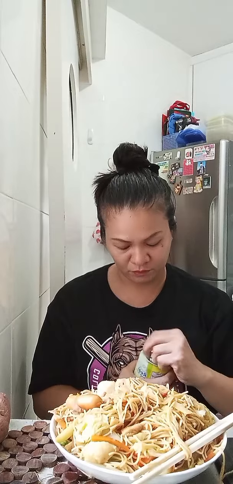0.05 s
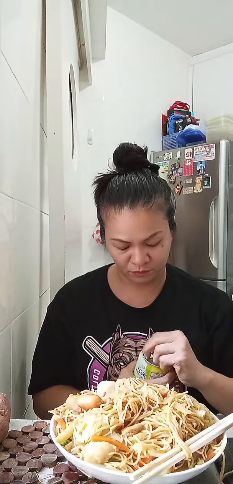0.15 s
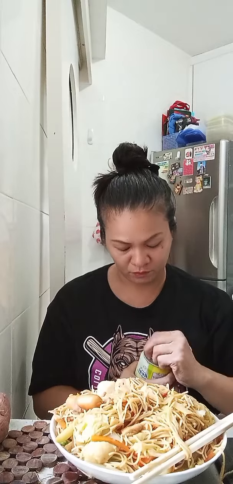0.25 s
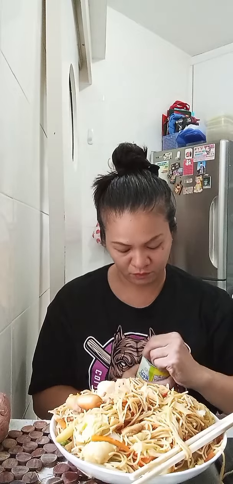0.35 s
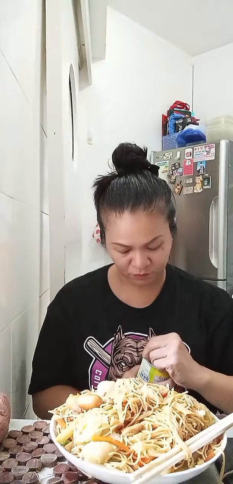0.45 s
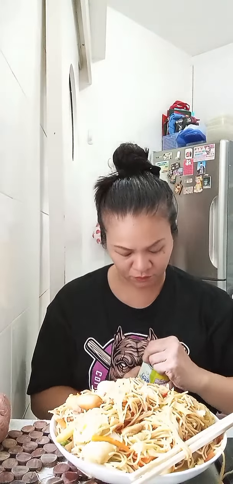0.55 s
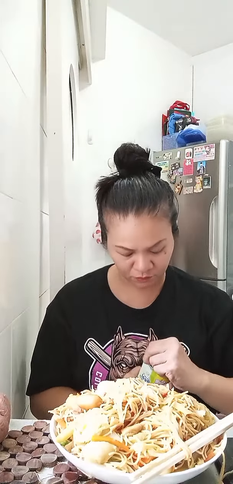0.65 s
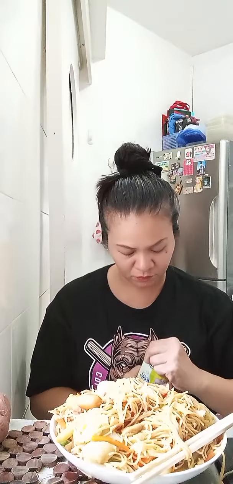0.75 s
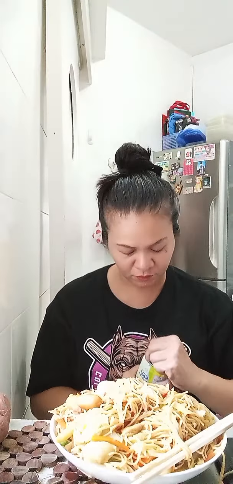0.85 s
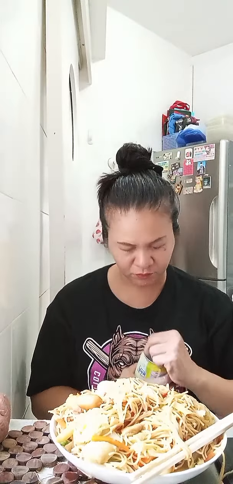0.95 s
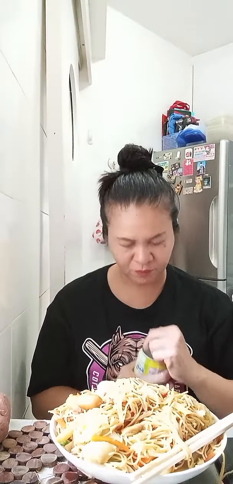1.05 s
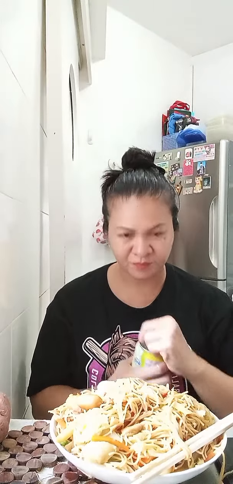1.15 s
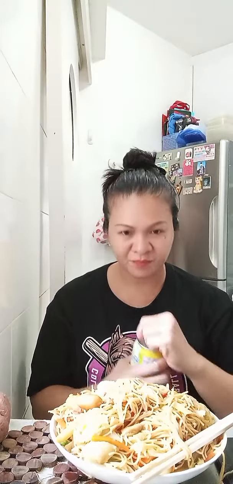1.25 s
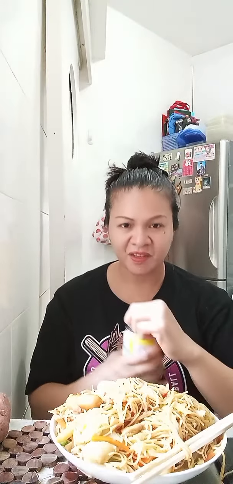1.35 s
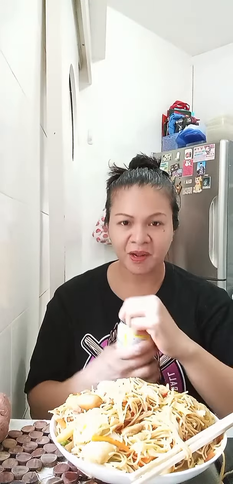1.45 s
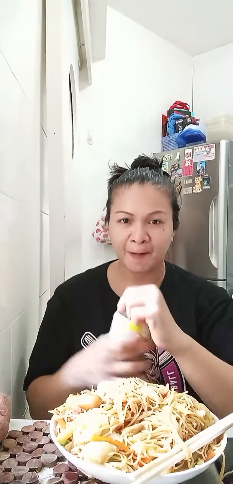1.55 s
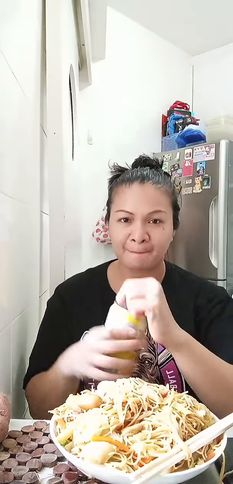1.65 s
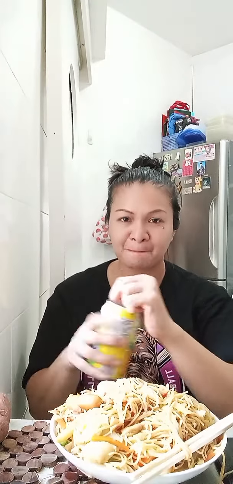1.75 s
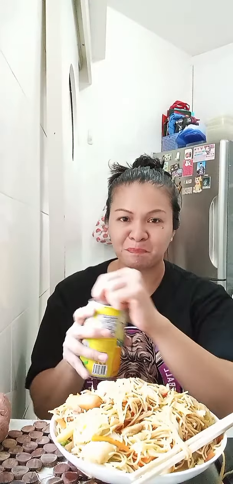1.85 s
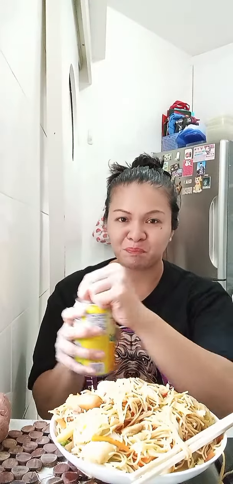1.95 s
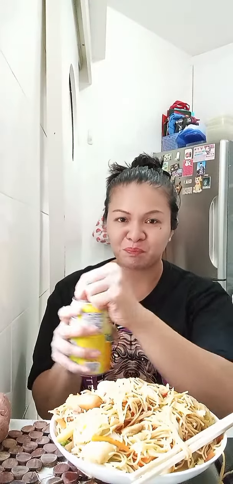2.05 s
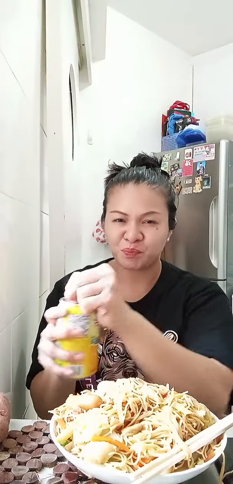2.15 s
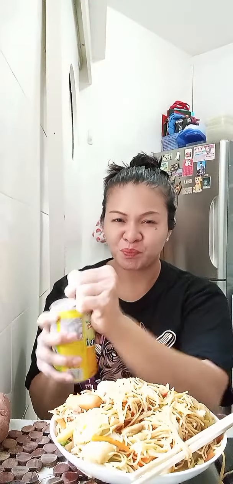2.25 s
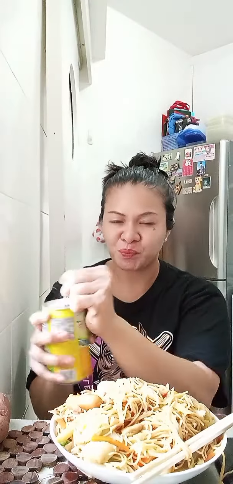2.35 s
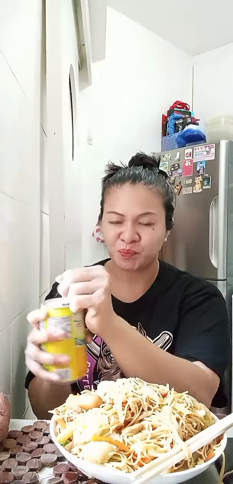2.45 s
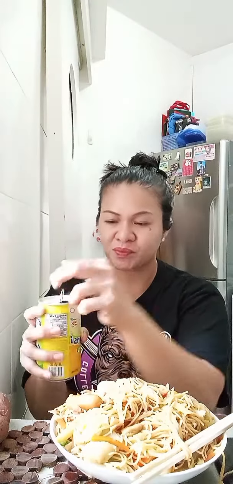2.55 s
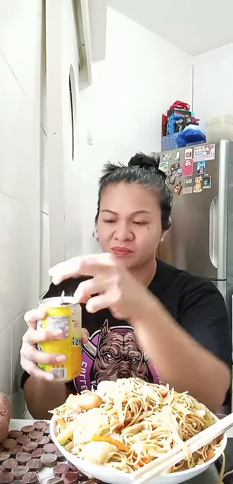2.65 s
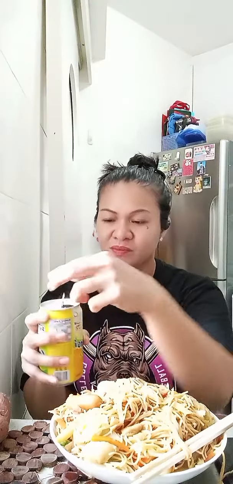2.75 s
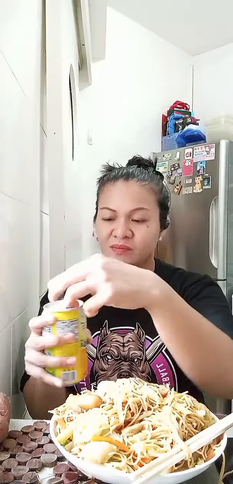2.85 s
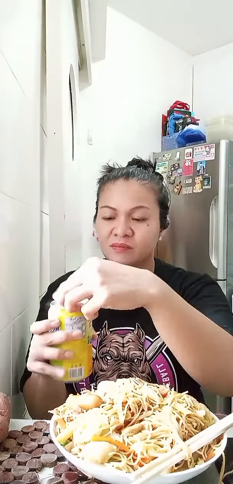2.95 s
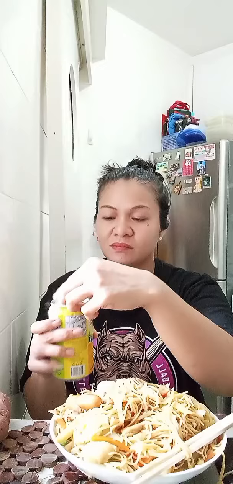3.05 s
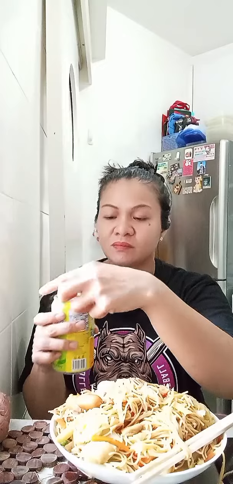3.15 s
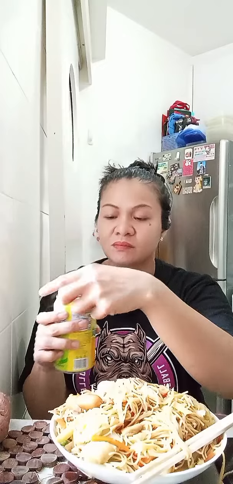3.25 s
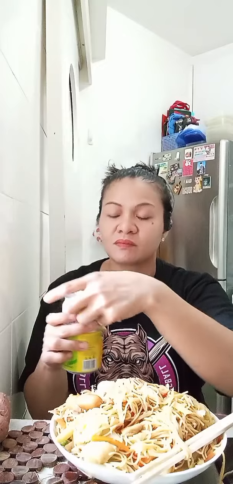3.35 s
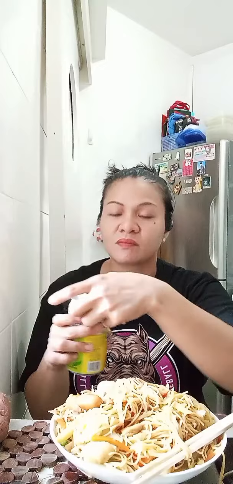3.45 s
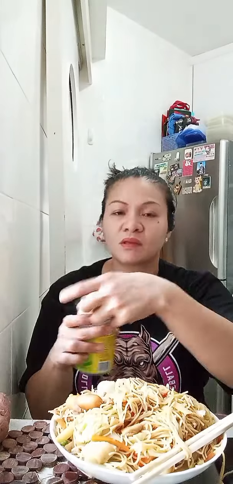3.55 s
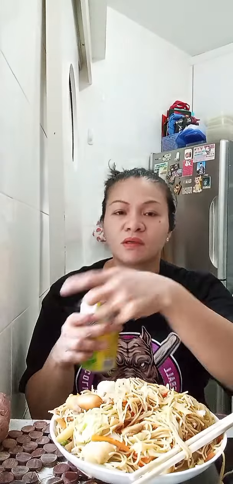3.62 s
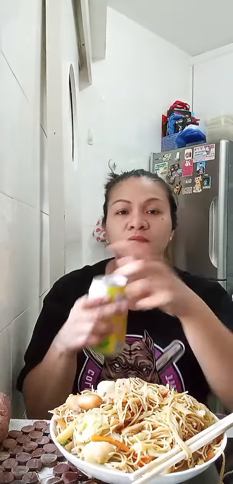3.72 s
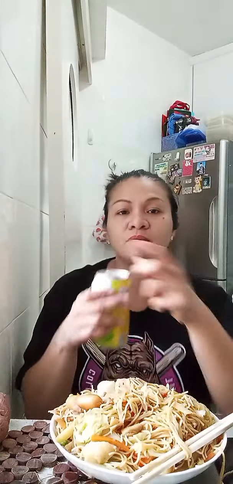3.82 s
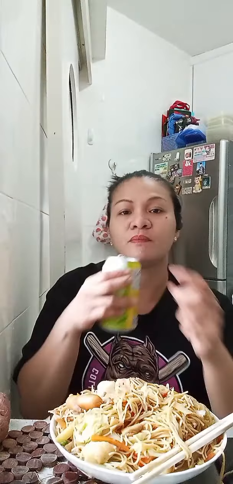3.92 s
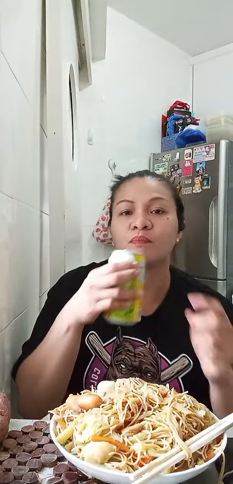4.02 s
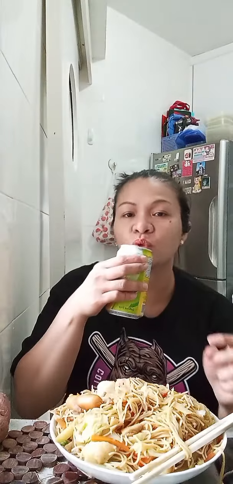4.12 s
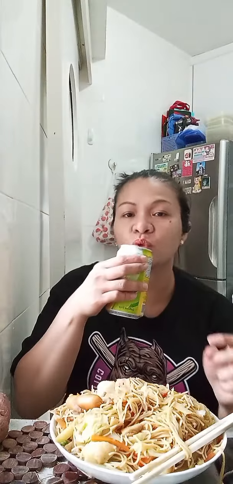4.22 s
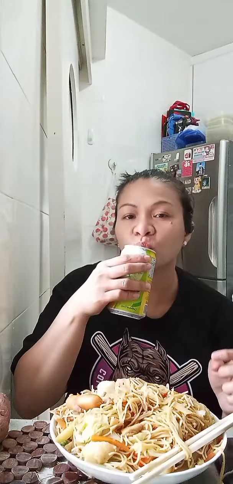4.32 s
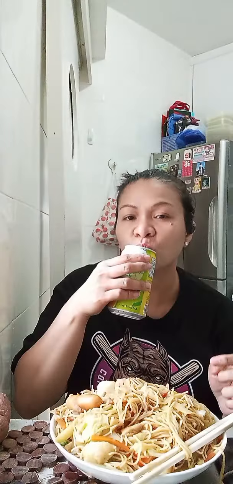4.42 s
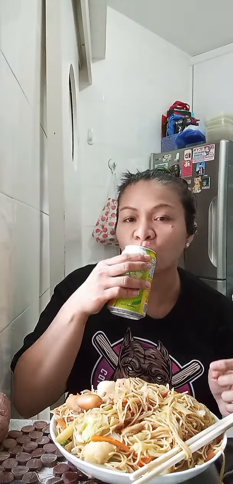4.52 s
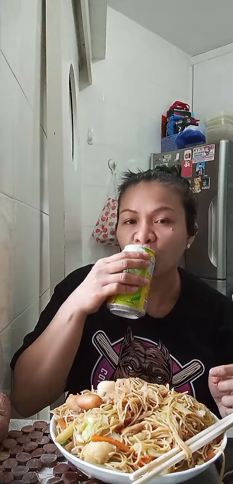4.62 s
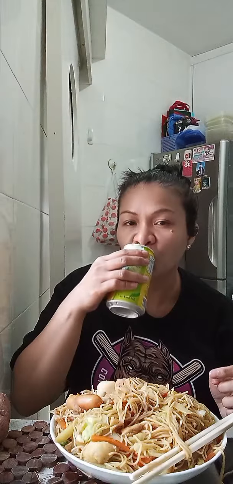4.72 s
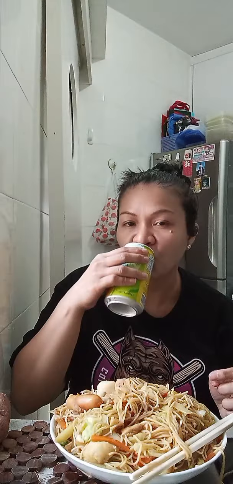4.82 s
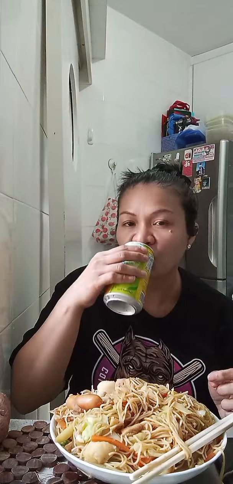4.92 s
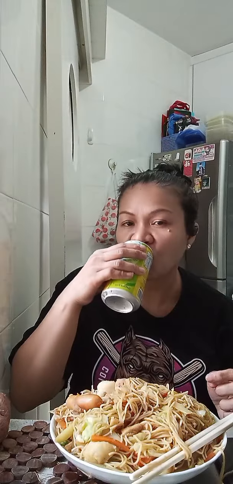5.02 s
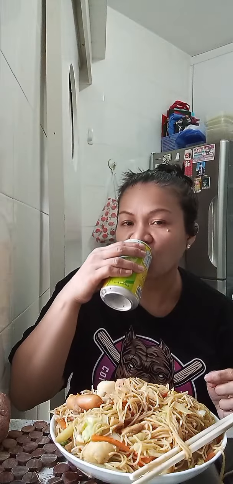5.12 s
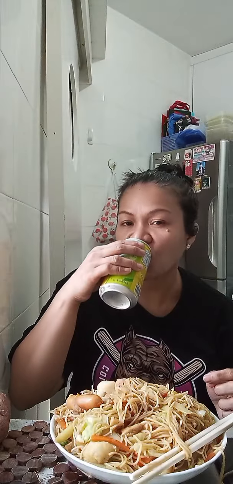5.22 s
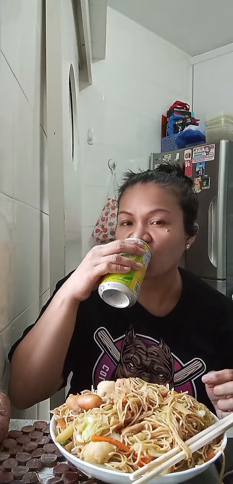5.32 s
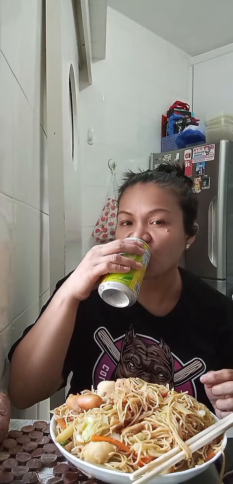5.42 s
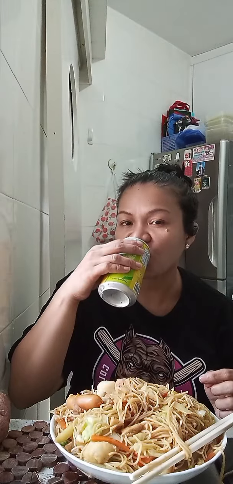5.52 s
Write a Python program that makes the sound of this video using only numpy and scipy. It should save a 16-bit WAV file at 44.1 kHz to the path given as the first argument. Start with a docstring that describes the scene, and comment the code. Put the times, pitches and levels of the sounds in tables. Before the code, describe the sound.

Throughout about 5.5 seconds, a fan hums low and slightly wavering, near 100 Hz, with a faint whine and soft rushing air in a small tiled kitchen. Thin, very quiet high squeaks come now and then. At 0.86 s a can's seal cracks: a sharp, bright spurt of gas with an instantaneous whistle and a faint singing note, gone in roughly a quarter second. Tiny ticks of fingers on the can follow around 1.4-1.6 s. At 2.27 s the tab clicks, at 2.30 the lid tears loudly with a hollow, rapidly stuttering pop and short fizz, and at 2.38 the flap snaps inward with a tinny ring. Short reflections trail off; the fan, briefly ducked by limiting, swells back. Light touches occur near 3.1, 3.5 and 4.0 s, with faint low bumps at 4.1, 4.16 and 5.07, then barely audible touches until the end. Close single microphone, identical in both channels.

```python
"""A drink can is opened by hand in a small tiled kitchen where a fan hums and now and then squeaks.
Coloured noise makes the short first spurt of gas and the later fizz; the spurt also whistles and sings.
The tab clicks, the lid tears with a pop and its flap snaps inward: noise bursts, can modes, air pulses.
Band noise makes light touches on the can and three faint low bumps in the fan's noise.
The fan is harmonics, a whine and rushing air. One microphone with a limiter."""
import sys
import numpy as np
from scipy import signal
from scipy.fft import rfft, irfft, next_fast_len
from scipy.io import wavfile
from scipy.ndimage import uniform_filter1d, minimum_filter1d, map_coordinates

SR = 44100
rng = np.random.default_rng(int(sys.argv[2]) if len(sys.argv) > 2 else 0)


def output_pcm(signal):
    """Save a mono or channel-first signal as 16-bit PCM at the path in sys.argv[1].

    Samples are clipped to [-1, 1] before scaling.
    """
    pcm = np.clip(np.atleast_2d(signal).T, -1, 1) * 32767
    wavfile.write(sys.argv[1], SR, np.round(pcm).astype(np.int16))


N = 246078

# snaps of the lid (tab, tear, flap): (time [s], crack level [dB], rise [s], crack t60 [s],
# ring level [dB], share of the free ring time [1], room level [dB])
LID_SNAPS = [(2.269, -14, 0.0013, 0.079, -13, 0.37, -9), (2.3008, 0.5, 0.0021, 0.04, -16, 0.84, -19),
             (2.3826, -7.5, 0.0025, 0.088, -10.5, 0.72, -12.5)]
# noise colour of the gas spurt: (frequency [Hz], density [dB per Hz])
GAS_COLOUR = [(100, -29), (250, -14), (450, -9), (620, -11.5), (1200, -6.5), (1850, -4), (2500, -11.5),
              (3700, -6), (5200, -3), (6200, -5), (7200, -2.5), (9600, -12), (14200, -8), (16000, -16)]
# noise colour of the tab click: (frequency [Hz], density [dB per Hz])
TAB_COLOUR = [(290, -79), (500, -61), (933, -60), (1200, -16), (1670, -6.5), (1980, -3), (2570, -18),
              (3100, -17.5), (3800, -10), (4450, -1), (4900, -12.5), (5450, -3), (6140, -19), (6700, -12.5),
              (7500, -19.5), (14900, -28), (16000, -18)]
# noise colour of the tear, also of the fizz through it: (frequency [Hz], density [dB per Hz])
TEAR_COLOUR = [(240, -72), (400, -23.5), (935, -4), (1330, -9.5), (1900, -9), (2250, -2), (2650, -15),
               (3370, -6.5), (3800, -13), (4310, -9), (4900, -10), (5600, -1.5), (7060, -4.5),
               (9320, -23.5), (13500, -15), (16000, -26)]
# noise colour of the flap snap: (frequency [Hz], density [dB per Hz])
FLAP_COLOUR = [(100, -48), (200, -23), (300, -16), (400, -14), (540, -16), (680, -7.5), (880, -4),
               (1130, -15), (1340, -4), (1560, -8), (1950, -3), (2550, -21), (3000, -11), (3450, -7),
               (3850, -19), (4400, -16), (5500, -21), (7000, -20), (10500, -35), (14200, -28), (16000, -40)]
# modes of the can: (frequency [Hz], level [dB], free t60 [s])
CAN_MODES = [(298.7, -5.5, 0.34), (388, 1.5, 0.18), (488, -1.5, 0.15), (654, 3.5, 0.18), (710, 2, 0.17),
             (873, -3, 0.21), (929, -3, .17), (1292, -0.5, .15), (1686, -5.5, 0.18), (1950, -3, 0.32),
             (2007, -6.5, 0.35), (2103, -4.5, 0.19), (2270, -3.5, 0.22), (2960, -8, 0.33), (3230, -7, 0.31),
             (3310, -10, 0.32), (4060, -6, 0.11), (4475, 7.5, .075), (5140, 5, .06), (5310, 5, 0.072),
             (5584, 9, .065), (6810, 7, .085)]
# resonances and dips of the slit and lid in the gas jet: (centre [Hz], width [Hz], gain [dB])
SLIT_RESONANCES = [(1650, 70, 3), (1820, 89, 5.5), (2024, 100, 3), (2990, 130, 5), (3550, 110, 3.5),
                   (3920, 80, 5.5), (4350, 170, -5), (5280, 150, 4), (5500, 120, -5), (6580, 45, 5),
                   (6900, 50, 12.5), (7190, 55, 9.5), (7880, 50, 12.5), (8200, 45, 7)]
# light touches on the can, and three faint low bumps in the fan's noise (4.106, 4.157, 5.065 s):
# (time [s], level [dB], centre [Hz], width [octaves], t60 [s])
TOUCHES_AND_BUMPS = [(.145, -57, 4800, 0.49, .04), (1.423, -51, 11500, 0.67, 0.02),
                     (1.447, -44, 7020, 0.17, .02), (1.505, -51.5, 3320, .45, 0.13),
                     (1.507, -52.5, 9000, 0.74, 0.028), (1.573, -59, 4400, .2, .02),
                     (1.580, -51, 4170, .22, 0.024), (2.59, -53, 2200, 1.24, .09),
                     (3.069, -59.5, 7450, 0.88, .03), (3.145, -42, 1420, 0.33, 0.041),
                     (3.487, -57, 4140, 0.94, 0.45), (3.542, -46, 3300, 1.24, 0.084),
                     (3.58, -54, 4500, 1.5, 0.026), (3.693, -55.5, 4100, 1.2, 0.078),
                     (3.747, -61, 14500, .25, .04), (4.03, -45.5, 5260, 0.77, 0.019),
                     (4.106, -37, 696, 0.53, .04), (4.157, -39.5, 1100, 0.53, .035),
                     (4.96, -59.5, 4100, .4, .15), (5.065, -43.5, 900, 0.79, .06),
                     (5.1, -58.5, 4200, 0.25, 0.22), (5.21, -55.5, 5000, 0.62, .07),
                     (5.273, -53, 5070, 0.32, 0.08)]
# squeaks of the fan: (mid time [s], level [dB])
FAN_SQUEAKS = [(.392, -64), (1.562, -55.5), (2.596, -60.5), (2.738, -66), (3.397, -61), (3.648, -57.5),
               (4.56, -58), (5.47, -56.5)]
# hum of the fan: (multiple of the motor tone [1], level [dB])
HUM_HARMONICS = [(1, 0), (2, -12), (3, -5), (4, -15.5), (5, -22.5)]
# noise colour of the air rushing from the fan: (frequency [Hz], density [dB per Hz])
DRAUGHT_COLOUR = [(20, -16), (40, -29), (70, -5.5), (130, 1), (270, 0.5), (480, -2.5), (900, -11.5),
                  (1300, -6), (1700, -17.5), (2400, -25.5), (7000, -30.5), (8500, -43), (11500, -45.5),
                  (14000, -38), (16000, -56)]
# resonances of the fan casing: (centre [Hz], width [Hz], gain [dB])
CASING_RESONANCES = [(128, 12, 4), (416, 10.4, 6.5), (792, 100, 8.5), (1080, 34, 9), (1962, 150, 6.5),
                     (6100, 460, 6)]
# decay of the tiled room: (frequency [Hz], t60 [s])
KITCHEN_DECAY = [(200, 0.4), (1000, 0.24), (2500, 0.4), (7000, 0.29), (15000, 0.3)]

TOP_HZ = 16000
# motor level: fixed mean, slow drift, faster flutter; rates in random knots per second
MOTOR_DB = -46.5
MOTOR_DRIFT_DB, MOTOR_DRIFT_PER_S = 0.94, 4.01
MOTOR_FLUTTER_DB, MOTOR_FLUTTER_PER_S = 1.76, 13
SQUEAK_HZ, SQUEAK_SCATTER = 7050, 0.0063  # scatter: share of the pitch
# first spurt: builds, sags as the pressure drops, dies away
SPURT_START_S, SPURT_DB, SPURT_ATTACK_S, SPURT_HOLD_S = 0.8573, -17.5, 0.0029, 0.034
SPURT_SAG_DB_PER_S, SPURT_RELEASE_DB_PER_S = 127.5, 268
# the narrow slit whistles briefly just after it opens
WHISTLE_DELAY_S, WHISTLE_DB, WHISTLE_ATTACK_S, WHISTLE_FADE_DB_PER_S = 0.0033, -9.5, 0.002, 2600
# the jet sets the taut lid singing; the note fades slower than the hiss releases
SING_HZ, SING_DB, SING_ATTACK_S, SING_FADE_DB_PER_S = 1824, -35, 0.015, 170
# the rest of the gas leaves through the tear by the same law
FIZZ_START_S, FIZZ_DB, FIZZ_ATTACK_S, FIZZ_HOLD_S = 2.3025, -17, 0.0028, 0.14
FIZZ_SAG_DB_PER_S, FIZZ_RELEASE_DB_PER_S = 187, 380


def amp(db):
    """Decibels to gain."""
    return 10 ** (np.asarray(db) / 20)


def unit(x):
    """Scale to rms 1."""
    return x / np.sqrt(np.mean(x ** 2) + 1e-20)


def along(points, hz):
    """Interpolate (Hz, value) points on a log frequency axis."""
    point_hz, values = np.transpose(points)
    return np.interp(np.log(hz + 1), np.log(point_hz + 1), values)


def humps(peaks, hz):
    """Gain of resonances or dips standing on a flat response."""
    gain = 1
    for centre_hz, width_hz, db in peaks:
        gain = gain + (amp(db) - 1) / (1 + (2 * (hz - centre_hz) / width_hz) ** 2)
    return gain


def wobble(knots_per_s):
    """Smooth random curve through normally distributed knots."""
    knots = rng.standard_normal(int(N * knots_per_s / SR) + 4)
    return map_coordinates(knots, [np.arange(N) * knots_per_s / SR])


def noise(gain, size=N):
    """Noise of rms 1, coloured by a gain of frequency."""
    spectrum = rfft(rng.standard_normal(size)) * gain(np.fft.rfftfreq(size, 1 / SR))
    return unit(irfft(spectrum, size))


def tone(hz, waver, waver_hz):
    """Sine of rms 1; its pitch wavers at random by a share of itself, below waver_hz."""
    pitch_hz = hz * (1 + waver * noise(lambda f: f < waver_hz))
    return unit(np.sin(2 * np.pi * np.cumsum(pitch_hz) / SR))


def add(track, start_s, sound):
    """Mix a sound into the track from start_s."""
    part = track[round(start_s * SR):][:len(sound)]
    part += sound[:len(part)]


def kitchen(x, room_db):
    """Direct sound plus the tiled walls' answer: noise decaying at its own rate in each band."""
    hz, t, bands = signal.stft(rng.standard_normal(SR // 2), SR, nperseg=256)
    decay = amp(-60 * t / along(KITCHEN_DECAY, hz)[:, None])
    tail = signal.istft(bands * decay, SR, nperseg=256)[1]
    tail *= 1 - np.exp(-(np.arange(len(tail)) / SR / 0.012) ** 2)  # echoes build up as they return
    echoes = signal.fftconvolve(x, tail / np.linalg.norm(tail))[:len(x)]
    return x + amp(room_db) * echoes


def fan(motor_hz=98.2, air_db=-44.0, whine_hz=2950, whine_width_hz=115, whine_db=-62):
    """Unsteady motor hum and wavering bearing whine under air that resonates in casing and room."""
    pitch_hz = motor_hz * (1 + 0.0055 * wobble(5) + 0.01194 * wobble(25))
    phase = 2 * np.pi * np.cumsum(pitch_hz) / SR
    hum = np.zeros(N)
    for multiple, db in HUM_HARMONICS:
        harmonic = unit(np.sin(multiple * phase + 2 * np.pi * rng.random()))
        hum += amp(db + 1.67 * wobble(20)) * harmonic
    drift_db = MOTOR_DRIFT_DB * wobble(MOTOR_DRIFT_PER_S)
    flutter_db = MOTOR_FLUTTER_DB * wobble(MOTOR_FLUTTER_PER_S)
    motor = amp(MOTOR_DB + drift_db + flutter_db) * hum

    whine = noise(lambda hz: 1 / (1 + ((hz - whine_hz) / whine_width_hz) ** 2))
    whine *= amp(whine_db + 1.65 * wobble(30))

    rush = noise(lambda hz: amp(along(DRAUGHT_COLOUR, hz)) * humps(CASING_RESONANCES, hz))
    air = amp(air_db + 0.93 * wobble(18)) * unit(kitchen(rush, room_db=-7.5))
    return motor + whine + air


def touches_and_bumps(grain_db=2, swell_db=-17, swell_s=0.021):
    """Light touches on the can and faint low bumps: decaying band noise, each inside a soft swell."""
    out = np.zeros(N)
    t = np.arange(-SR // 10, SR // 5) / SR  # onset at 0
    for time_s, db, centre_hz, octaves, t60_s in TOUCHES_AND_BUMPS:
        band = noise(lambda hz: (1 + (np.log2((hz + 1) / centre_hz) / octaves) ** 2) ** -2, size=len(t))
        tick = amp(-60 * np.maximum(t, 0) / t60_s) * (t > 0)
        swell = amp(swell_db) * np.exp(-(t / swell_s - 0.5) ** 2)
        add(out, time_s + t[0], amp(db) * (tick + swell) * band)
    grain = unit(amp(grain_db * wobble(700)))
    return kitchen(out * grain, room_db=-7.5)


def squeaks(length_s=0.047, octave_db=-11):
    """A dry bearing gives thin, short squeaks near one pitch, with a weak octave."""
    out = np.zeros(N)
    size = int(length_s * SR)
    for mid_s, db in FAN_SQUEAKS:
        hz = SQUEAK_HZ * (1 + SQUEAK_SCATTER * rng.standard_normal())
        pitch_hz = hz * (1 + 0.0088 * noise(lambda f: f < 300, size=size))
        phase = 2 * np.pi * np.cumsum(pitch_hz) / SR
        voice = np.sin(phase) + amp(octave_db) * np.sin(2 * phase)
        add(out, mid_s - length_s / 2, amp(db) * np.hanning(size) * voice)
    return kitchen(out, room_db=-4.5)


def outflow(start_s, attack_s, hold_s, sag_db_per_s, release_db_per_s):
    """Gain of escaping gas: quick attack, sagging hold, then release."""
    t = np.maximum(np.arange(N) / SR - start_s, 0)
    fall_db = sag_db_per_s * np.minimum(t, hold_s) + release_db_per_s * np.maximum(t - hold_s, 0)
    return (1 - np.exp(-(t / attack_s) ** 2)) * amp(-fall_db)


def gas(whistle_hz=4580):
    """Gas sputters through the cracked seal, whistling and singing the lid; later through the tear."""
    spurt = noise(lambda hz: amp(along(GAS_COLOUR, hz)) * humps(SLIT_RESONANCES, hz))
    spurt *= unit(amp(0.36 * wobble(900)))  # sputter
    spurt *= amp(SPURT_DB) * outflow(SPURT_START_S, SPURT_ATTACK_S, SPURT_HOLD_S,
                                     SPURT_SAG_DB_PER_S, SPURT_RELEASE_DB_PER_S)

    whistle = amp(WHISTLE_DB) * tone(whistle_hz, waver=0.008, waver_hz=200)
    whistle *= outflow(SPURT_START_S + WHISTLE_DELAY_S, WHISTLE_ATTACK_S, 0, 0, WHISTLE_FADE_DB_PER_S)

    sing = amp(SING_DB) * tone(SING_HZ, waver=0.014, waver_hz=90)
    sing *= outflow(SPURT_START_S, SING_ATTACK_S, 0, 0, SING_FADE_DB_PER_S)

    fizz = noise(lambda hz: amp(along(TEAR_COLOUR, hz)))
    fizz *= unit(amp(1.1 * wobble(490)))
    fizz *= amp(FIZZ_DB) * outflow(FIZZ_START_S, FIZZ_ATTACK_S, FIZZ_HOLD_S,
                                   FIZZ_SAG_DB_PER_S, FIZZ_RELEASE_DB_PER_S)
    return kitchen(spurt + whistle + sing, room_db=-13.0) + kitchen(fizz, room_db=-11.5)


def lid(waver=0.007):
    """Each snap is a burst of cracking metal that rings the can; a pressing finger shortens the ring."""
    out = np.zeros(N)
    t = np.arange(SR * 3 // 4) / SR
    colours = [TAB_COLOUR, TEAR_COLOUR, FLAP_COLOUR]
    for snap_row, colour in zip(LID_SNAPS, colours):
        time_s, crack_db, rise_s, crack_t60_s, ring_db, free_share, room_db = snap_row
        snap = noise(lambda hz: amp(along(colour, hz)), size=len(t))
        snap *= amp(crack_db - 60 * t / crack_t60_s)
        for hz, mode_db, free_t60_s in CAN_MODES:
            # the flexing lid detunes its modes
            pitch_hz = hz * (1 + waver * noise(lambda f: f < 60, size=len(t)))
            turns = np.cumsum(pitch_hz) / SR + rng.random()
            level_db = ring_db + mode_db + along(colour, hz) - 60 * t / (free_t60_s * free_share)
            snap += amp(level_db) * np.sin(2 * np.pi * turns)
        rise = 1 - np.exp(-(t / rise_s) ** 2)
        add(out, time_s, kitchen(snap * rise, room_db))
    return out


def pop(start_s=2.3186, stop_s=2.369, slip_s=0.0047, pop_hz=960, sag=0.2, life_s=0.001,
        first_db=-3, slip_db=-11, fade_db=-8):
    """The opening pops, then the flap tears in quick slips that pump the air at a sinking pitch."""
    out = np.zeros(N)
    t = np.arange(SR // 50) / SR
    times_s = np.arange(start_s, stop_s, slip_s)
    chances = rng.standard_normal((len(times_s), 3))
    for k, (time_s, (pitch_chance, level_chance, time_chance)) in enumerate(zip(times_s, chances)):
        progress = k / len(times_s)
        hz = pop_hz * (1 - sag * progress + 0.093 * pitch_chance)
        phase = 2 * np.pi * hz * t
        flow = t / life_s * np.exp(1 - t / life_s) * np.sin(phase)
        pressure = np.gradient(flow, phase)  # follows the change of flow
        db = slip_db + fade_db * progress + 2.6 * level_chance if k else first_db
        add(out, time_s + 0.0005 * time_chance, amp(db) * pressure)
    return kitchen(out, room_db=-15.0)


def scene():
    """Everything reaches one microphone, copied to both channels."""
    mono = fan() + touches_and_bumps() + squeaks() + gas() + lid() + pop()
    return np.array([mono, mono])


def record(dry, ceiling_db=-13.5, release_db_per_s=85, ahead_s=0.011):
    """Limiter: ducks just ahead of each burst, recovers linearly in dB; then a cut above TOP_HZ."""
    power = np.abs(uniform_filter1d(dry ** 2, size=SR // 300))
    over_db = np.maximum(0, 10 * np.log10(power + 1e-12) - ceiling_db)
    ahead = int(ahead_s * SR)
    over_db = -minimum_filter1d(-over_db, ahead, origin=-(ahead // 2))  # look-ahead maximum
    recovery_db = release_db_per_s * np.arange(N) / SR
    held_db = np.maximum.accumulate(over_db + recovery_db, axis=1) - recovery_db
    cut_db = uniform_filter1d(held_db, SR // 500)
    size = next_fast_len(N + SR // 2)
    band = np.fft.rfftfreq(size, 1 / SR) < TOP_HZ
    return irfft(rfft(dry * amp(-cut_db), size) * band, size)[:, :N]


dry = scene()
out = record(dry)
output_pcm(out)
```